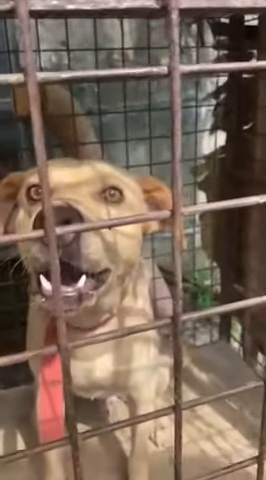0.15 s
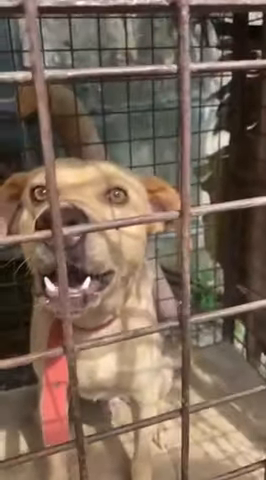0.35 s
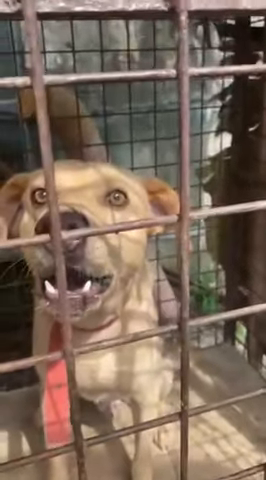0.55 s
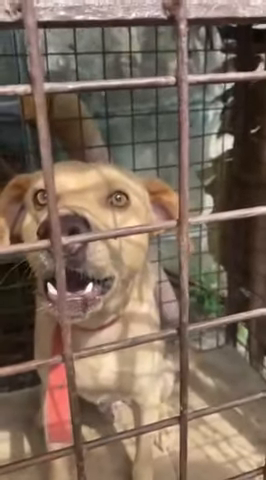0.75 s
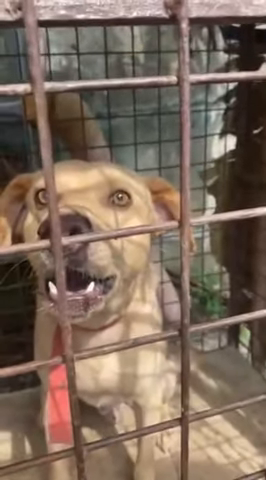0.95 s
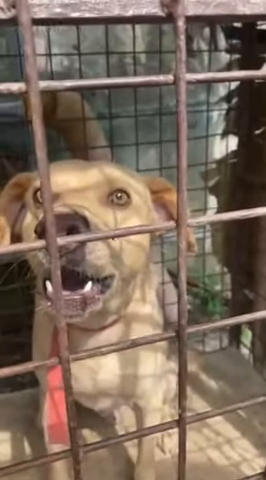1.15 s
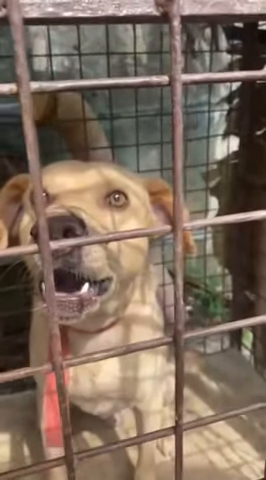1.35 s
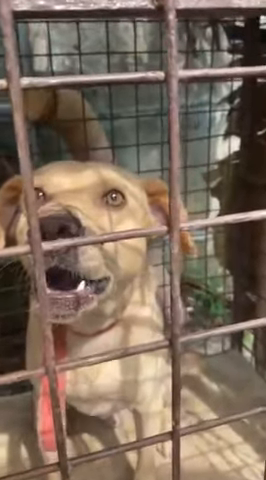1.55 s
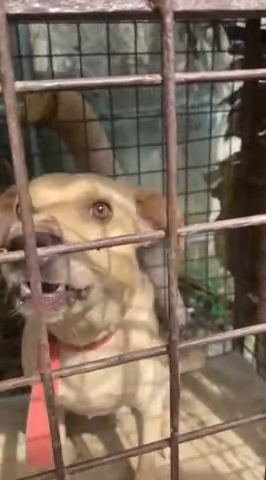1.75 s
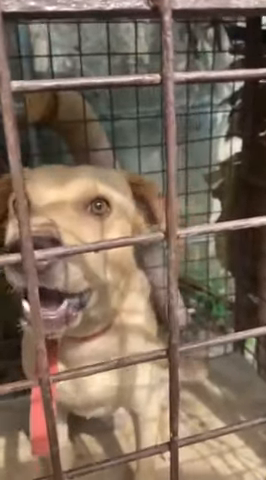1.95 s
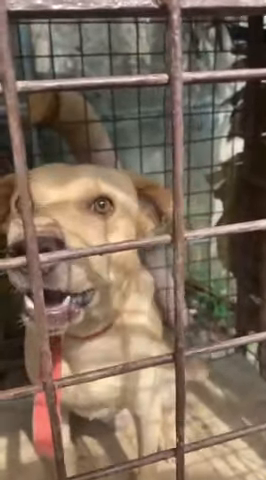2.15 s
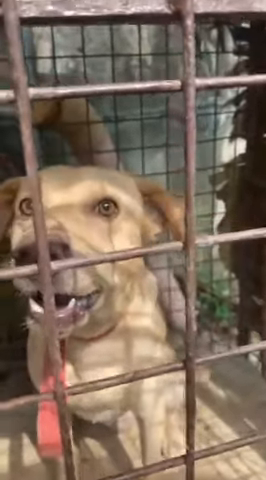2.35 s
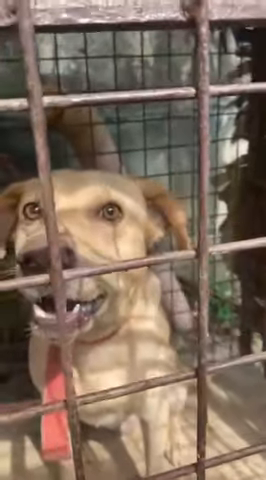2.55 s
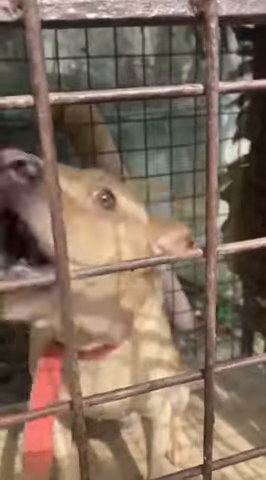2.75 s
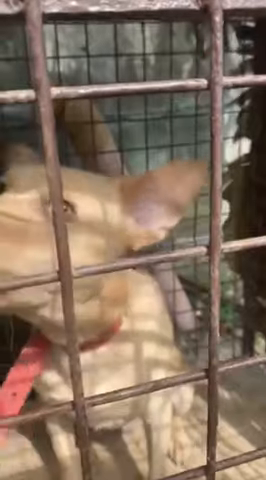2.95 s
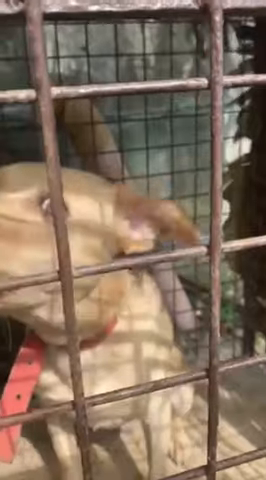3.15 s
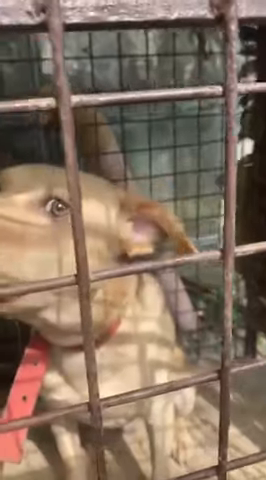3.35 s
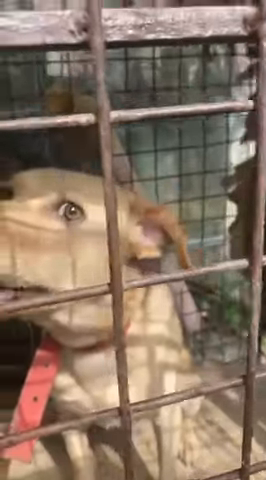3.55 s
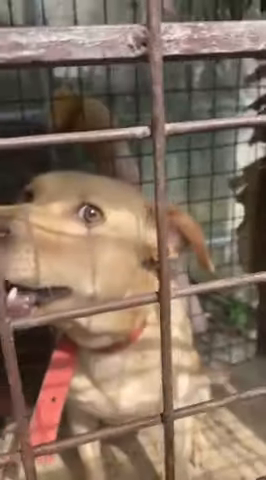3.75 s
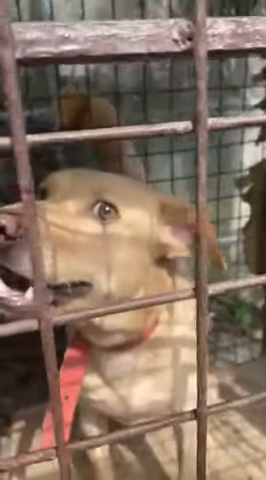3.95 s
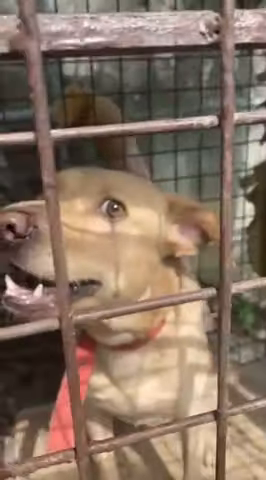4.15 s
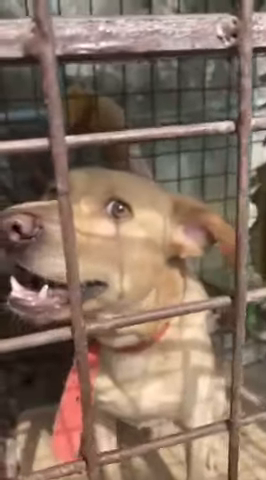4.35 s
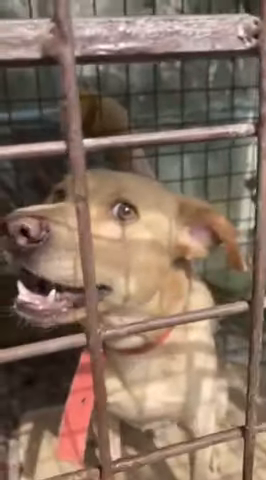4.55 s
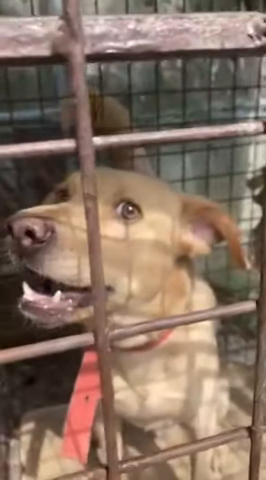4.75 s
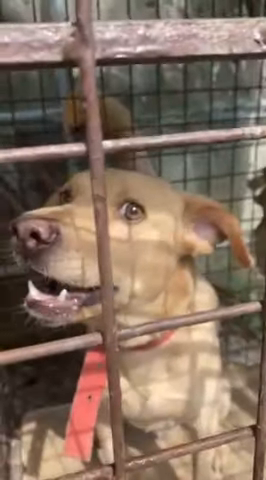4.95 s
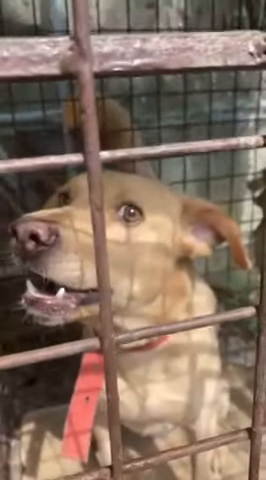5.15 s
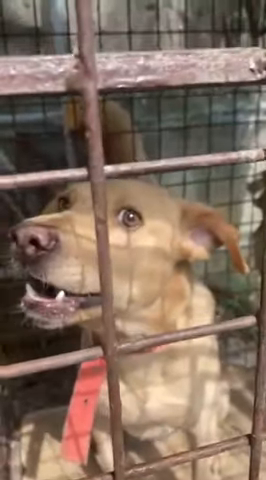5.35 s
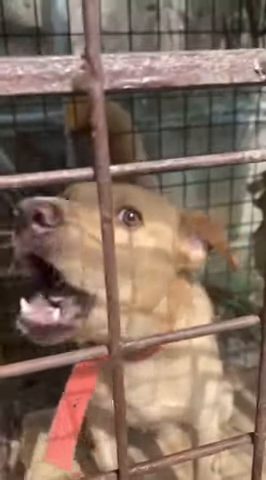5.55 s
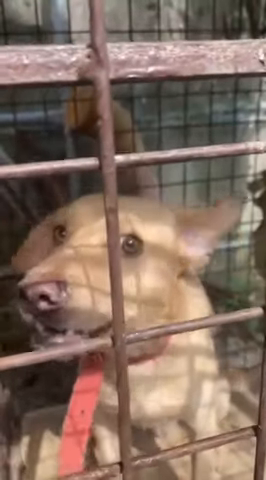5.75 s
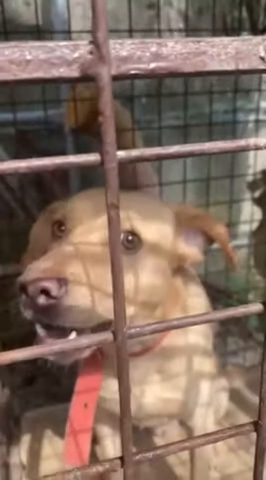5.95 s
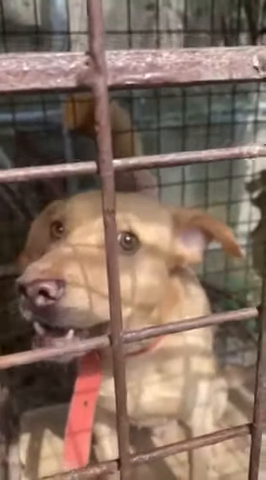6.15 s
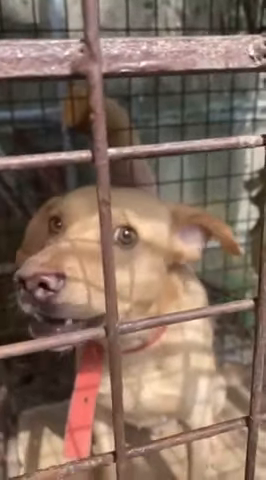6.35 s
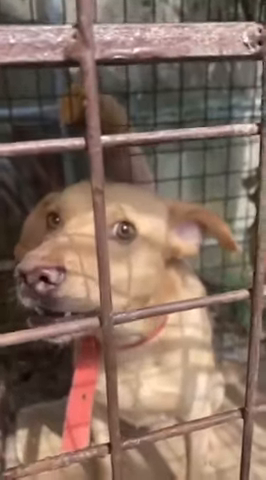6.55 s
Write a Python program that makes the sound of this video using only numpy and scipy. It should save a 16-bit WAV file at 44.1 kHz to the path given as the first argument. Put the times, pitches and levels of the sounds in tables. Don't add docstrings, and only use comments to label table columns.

```python
import sys
import numpy as np
from scipy import signal
from scipy.fft import rfft, irfft, next_fast_len
from scipy.io import wavfile
from scipy.ndimage import uniform_filter1d, minimum_filter1d

SR = 44100
rng = np.random.default_rng(int(sys.argv[2]) if len(sys.argv) > 2 else 0)


def dump(signal):
    limited = np.clip(np.atleast_2d(signal).T, -1, 1)
    pcm = np.round(limited * 32767).astype(np.int16)
    wavfile.write(sys.argv[1], SR, pcm)


def undo_db(level):
    steps = np.asarray(level, float) / 20
    return 10 ** steps


N = 291242

# pitch_hz, level_db (per Hz)
YARD_SPECTRUM = [(15, -30), (25, -0.5), (73, 4), (202, -9), (531, -27.5), (1670, -24.5), (1950, -31.5),
                 (3870, -44), (4180, -49.5), (4630, -49), (5260, -53.5), (8100, -51), (11000, -55),
                 (14300, -72.5), (22000, -120)]
# time_s, effort_db
GROWL_EFFORT = [
    [(0.47, -65), (.49, -50), (.52, -46.5), (0.55, -32.5), (0.684, -32.5), (0.874, -39.5), (0.884, -38),
     (0.938, -39), (1.494, -42), (1.524, -67.5), (1.55, -61)],
    [(1.885, -60), (1.902, -45), (2.002, -34.5), (2.218, -40), (2.234, -41), (2.324, -39), (2.624, -42),
     (2.654, -77), (2.67, -25)],
    [(2.84, -36.5), (2.92, -46.5), (2.98, -41.5), (3.024, -49.5), (3.254, -47.5), (3.314, -50.5),
     (3.642, -59.5), (3.73, -69.5), (3.8, -68.5)],
    [(4.84, -47), (4.854, -50), (4.984, -43), (5.112, -55), (5.342, -48), (5.354, -51.5), (5.452, -42.5),
     (5.48, -61.5), (5.49, -42)],
    [(5.8, -62), (5.846, -53.5), (5.856, -44), (5.934, -44), (6.06, -40.5), (6.206, -57.5), (6.302, -51),
     (6.484, -66.5), (6.544, -55.5), (6.6, -74)],
]
# time_s, effort_db
GRUMBLE_EFFORT = [
    [(0.0, -49), (0.008, -69.5), (0.232, -58), (0.25, -46), (0.29, -73), (0.344, -77), (.353, -61),
     (0.404, -57.5), (0.454, -69), (0.46, -60)],
    [(3.8, -67), (3.836, -60), (3.9, -56), (4.178, -63.5), (4.214, -64.5), (4.3, -70), (4.4, -79),
     (4.46, -92)],
    [(4.47, -97.5), (4.496, -58), (4.562, -51), (4.59, -57.5), (4.646, -33), (4.774, -39), (4.818, -49.5),
     (4.84, -49)],
]
# time_s, effort_db
RATTLE_EFFORT = [
    [(1.72, -36), (1.732, -48.5), (1.786, -40.5), (1.88, -73)],
    [(5.67, -34.5), (5.718, -50), (5.732, -43), (5.8, -71)],
]
# time_s, effort_db
BARK_EFFORT = [
    [(1.54, -48.5), (1.556, -43), (1.58, -23.5), (1.636, -19.5), (1.682, -32), (1.69, -35.5), (1.74, -55.5)],
    [(2.665, -50.5), (2.683, -42), (2.69, -24), (2.712, -21.5), (2.751, -20.5), (2.801, -27),
     (2.839, -59.5), (2.86, -49)],
    [(5.49, -49.5), (5.498, -41), (5.504, -37), (5.518, -28.5), (5.544, -18.5), (5.588, -20),
     (5.654, -44.5), (5.69, -49.5)],
]
# time_s, pitch_hz, second_tone_hz (rises with the jaws), roughness (0-1)
BARK_SWEEP = [
    [(1.54, 455, 463.5, 0), (1.566, 507.6, 522.2, 0.18), (1.582, 580.3, 596.6, 0.34),
     (1.598, 611, 868, 0.6), (1.635, 597.6, 1014, 0.4), (1.665, 539.7, 1013, 0.4), (1.74, 447, 784, 0.77)],
    [(2.665, 420.5, 432, 0.6), (2.688, 506.5, 518, 0.4), (2.706, 592.2, 625, 0.3), (2.72, 587.7, 907, 0.55),
     (2.752, 581.8, 1068, 0.58), (2.8, 540.5, 899, 0.5), (2.86, 415, 730, 0.7)],
    [(5.49, 342.2, 344, 0.4), (5.512, 480.7, 499.4, 0.4), (5.528, 622.7, 745.7, 0.45),
     (5.545, 596.3, 900, 0.7), (5.568, 570, 1098, 0.4), (5.595, 570, 1136, 0.32), (5.62, 498.4, 1055, 0.18),
     (5.69, 454, 774, 0.8)],
]
# tone_start_db, tone_end_db, chest_thump_db
BARK_BALANCE = [
    (-16, -12.5, -41.5),
    (-13, -10.5, -33.5),
    (-10.5, -17.5, -47.5),
]
# time_s, peak_db
HARD_SLAPS = [(0.66, -29), (0.733, -30.5), (0.839, -23.5), (0.884, -25), (1.068, -22.5), (1.17, -32),
              (1.312, -28), (1.444, -25.5), (1.477, -27), (1.744, -33), (1.767, -35), (1.789, -32.5),
              (1.963, -27), (1.998, -29.5), (2.189, -35), (2.327, -27.5), (4.857, -37), (4.882, -35),
              (4.95, -42), (5.732, -34.5), (5.744, -33.5)]
# time_s, peak_db
MORE_HARD_SLAPS = [(0.904, -24), (0.93, -40), (1.126, -32), (1.9, -56), (1.918, -40), (2.132, -31.5),
                   (2.155, -33), (2.203, -21.5), (2.246, -30), (2.371, -30), (2.439, -25.5), (4.606, -42),
                   (5.855, -44), (5.891, -29), (5.938, -33), (5.964, -34), (6.009, -29), (6.034, -31),
                 (6.052, -38), (6.085, -28), (6.247, -42.5), (6.27, -37), (6.327, -40), (6.348, -36),
                 (6.514, -48),
                   (.611, -24), (.644, -42), (.769, -22.5), (1.036, -25), (1.143, -33), (1.237, -23.5),
                (1.403, -30), (1.426, -32), (2.045, -20), (2.109, -29), (2.307, -25.5), (2.401, -23.5),
                (2.537, -21.5), (2.62, -48), (4.553, -38), (4.654, -23), (4.708, -26.5), (4.768, -41),
                (4.914, -35), (4.975, -31), (5.297, -41), (5.332, -43), (5.413, -28), (5.453, -50),
                (5.992, -28), (6.105, -42), (6.127, -36), (6.293, -35.5)]
# start_s, end_s, start_rate_hz, end_rate_hz, roughness (0-1)
SETTLED_FOLDS = [(0, .22, 85, 83, .3), (.53, .64, 165, 150, .3), (.64, .86, 150, 159, .25),
                 (1.4, 1.5, 115, 115, .5), (1.7, 1.82, 45, 45, .35), (2.02, 2.18, 142, 136, .5),
                 (2.5, 2.62, 150, 158, .55), (2.84, 2.94, 325, 198, .3), (2.94, 3.085, 196, 158, .38),
                 (4.62, 4.79, 158, 148, .42), (5.02, 5.08, 150, 150, .55), (5.68, 5.74, 60, 60, .5),
                 (6.39, 6.51, 92, 88, .3)]
# time_s, slap_rate_hz, roughness (0-1)
SHUT_LIP_MOAN = [(3.1, 108, .45), (3.25, 115, .45), (3.38, 113, .3), (3.47, 110, .14), (3.6, 104, .12),
                 (3.65, 100, .12), (3.774, 89.5, .12), (3.842, 105, .14), (3.982, 109, .17),
                 (4.072, 96, .16), (4.15, 98, .16), (4.4, 79, .14)]
# start_s, lip_resonance_hz, lip_db, mouth_db, chest_db
MUZZLE_POSES = [(0, 718, 4, -10.5, -12), (.46, 644, 4.5, -5.5, -8), (.9, 643, 3.5, -3, -8.5),
                (1.7, 682, 4.5, -13, -10.5), (1.88, 649, 5, -13, -2), (1.945, 674, 5.5, -1.5, -4),
                (2.01, 639, 2.5, -5.5, -4.5), (2.84, 711, -15.5, -9, -11.5), (3.099, 649, -6.5, -8, -9),
                (3.44, 654, -3.5, -7, -4), (3.8, 735, 4.5, -5, -4.5), (4.46, 726, 9, -4, -7),
                (4.839, 682, 3, -5, -3), (5.1, 652, 0.5, -4.5, -4), (5.669, 650, -2.5, -10.5, -8),
                (5.798, 658, 2, -2.5, -2.5), (6.18, 673, -11.5, -9, -0.5), (6.37, 677, -7, -4.5, 0.5),
                (6.5, 670, -10, -5, -2.5)]
# start_s, rasp_db, upper_rasp_db, air_db
BREATHINESS = [(0, -5, -5, -6), (.3, -5.5, 0, -1.5), (.46, 1.5, 0, -0.5), (.8, 2, 1.5, 1.5),
               (1.7, -5.5, -1, 1), (1.88, 0.5, -0.5, 3.5), (2.4, 0.5, -2, 1.5), (2.84, -3, -6, -1.5),
               (3.1, 0, -7.5, 0.5), (3.45, 0.5, -7.5, 0.5), (3.8, 0.5, -4, 3), (4.46, -1, 1.5, 6),
               (4.6, 3, 1.5, 2.5), (4.84, 0, 0.5, 2), (5.1, -2, 1.5, -1), (5.669, -10, 2, -1),
               (5.798, 1.5, 0.5, 5.5), (5.96, 1, 1, 2.5), (6.18, -5, 2, 1.5), (6.4, -2, 1.5, 4.5)]
# time_s, shut (0-1)
LIPS_SHUT = [(0, .5), (.45, 0), (2.8, 0), (2.9, 1), (4.4, 1), (4.5, .4), (4.65, 0), (6.1, 0), (6.3, .35)]
# pitch_hz, width_hz, level_db
THROAT_MODES = [(407, 200, -8.5), (528.5, 63, 2)]
# pitch_hz, width_hz, level_db
MOUTH_MODES = [(944, 100, -20.5), (1254, 410, -21), (1513.5, 100, -7), (1850, 380, -31.5)]
# pitch_hz, width_hz, level_db
NOSE_MODES = [(1224, 380, 18.5), (1677, 500, 13.5), (2020, 160, -21)]
# pitch_hz, width_hz, level_db
RASP_MODES = [(2398, 230, 2.5), (3310, 820, -8.5), (3665, 330, -8.5), (3980, 590, -9)]
# pitch_hz, width_hz, level_db
AIR_MODES = [(5130, 1100, 0), (6250, 3000, -10), (8000, 640, -2), (9500, 4400, -11.5), (9600, 170, -10),
             (11000, 610, -23)]
# pitch_hz, width_hz, level_db
OPEN_THROAT_MODES = [(1573, 270, 7.5), (2080, 380, -3), (2617, 370, -0.5), (3342, 300, -16.5),
                     (4260, 440, -17), (5300, 600, -17), (7130, 4300, -16), (8960, 700, -32.5),
                     (10600, 180, -32.5), (10570, 680, -19.5)]
# pitch_hz, width_hz, level_db
PANT_MODES = [(1750, 400, -0.5), (2320, 340, -1), (2900, 500, 1.5), (3600, 280, -9), (4500, 600, -10.5),
              (6200, 2000, -12.5)]
# time_s, level_db, half_length_s
PANT_RUSHES = [
    (1.697, -51.5, 0.083),
    (2.83, -62.5, 0.016),
    (5.673, -46, 0.05),
]
# time_s, level_db, half_length_s
TONE_SURGES = [(1.577, -11, 0.0092), (1.617, -15, 0.0051), (1.644, -15, 0.0079), (1.659, -11.5, 0.0037),
               (1.678, -16, 0.0069), (1.698, -16.5, 0.0031), (2.7, -4, 0.007), (2.732, -22.5, 0.0037),
               (2.752, -19.5, 0.0024), (2.768, -19, 0.0054), (2.782, -17, 0.0051), (2.801, -15.5, 0.0059),
               (2.816, -19, .003), (2.837, -27, 0.0099), (5.523, -16.5, 0.0082), (5.554, -21, 0.0034),
               (5.582, -12, 0.013), (5.614, -12, 0.013), (5.634, -28.5, 0.021)]
# time_s, peak_db, half_length_s
JAW_BURSTS = [(1.6026, -10, 0.0082), (1.6118, -12, 0.0041), (1.6241, -10.5, 0.0017), (1.6377, -9.5, 0.0077),
              (1.6592, -16, 0.0017), (1.6787, -20.0, 0.0045), (1.6963, -29, 0.0035), (1.704, -34.5, 0.0012),
              (2.7119, -10.5, 0.0058), (2.7422, -9.3, 0.0029), (2.7513, -4.5, 0.0066),
              (2.7675, -12.5, 0.0032), (2.7792, -11.5, 0.0013), (2.795, -16.5, 0.0027),
              (2.8168, -18, 0.0017), (2.8235, -32.5, 0.0013), (5.5461, -7, 0.0066), (5.5627, -8.7, 0.0052),
              (5.5716, -11.5, 0.0067), (5.5866, -11, 0.0023), (5.6068, -10, 0.0039),
              (5.6164, -30.5, 0.0035), (5.6392, -25.5, 0.0018)]
# time_s, peak_db, half_length_s
THROAT_BURSTS = [(1.576, -18, 0.004), (1.595, -12, 0.0038), (1.612, -13.5, 0.003), (1.636, -15, 0.008),
                 (1.646, -18.5, 0.0055), (1.679, -21, 0.0046), (1.69, -34.5, 0.0037),
                 (2.6866, -23.5, 0.0017), (2.696, -20.5, 0.0033), (2.7268, -17, 0.0018),
                 (2.735, -14.5, 0.0016), (2.739, -18.5, 0.0065), (2.754, -11.5, 0.0021),
                 (2.7644, -13.5, 0.0061), (2.787, -14.5, 0.0036), (2.803, -18, 0.0037), (5.545, -14, 0.012),
                 (5.562, -19.5, 0.0012), (5.574, -8.5, 0.0056), (5.6095, -18, 0.0024),
                 (5.629, -30.5, 0.0028), (5.642, -32.5, 0.0014)]
# pitch_hz, left_lead_rad
PORT_PHASE = [(0, 0), (300, 0), (700, -.12), (1200, -.15), (2150, 0), (2600, .5), (3600, .3), (4000, 2.5),
              (4800, 3.3), (5400, 6.3), (6900, 6.5), (8500, 8.1), (11700, 8.3)]
# pitch_hz, left_minus_right_db
PORT_BALANCE = [(60, 0), (240, 0), (350, -1.5), (620, -2.2), (1120, -1.5), (2000, -.5), (3600, -1),
                (6450, -.3), (11600, 0)]

USUAL_DB = -45
FULL_DB = -17


def evened(x, seconds=None):
    power = np.mean(x ** 2) if seconds is None else abs(uniform_filter1d(x ** 2, int(seconds * SR)))
    return x / np.sqrt(power + 1e-14)


def read(points, hz):
    f, value = np.transpose(points)
    return np.interp(np.log(hz + 1), np.log(f + 1), value)


def line(t, points):
    return np.interp(t, *np.transpose(points))


def poses(t, table):
    rows = np.array(table)
    current = np.maximum(np.searchsorted(rows[:, 0], t) - 1, 0)
    return uniform_filter1d(rows[current, 1:], int(.03 * SR), axis=0).T


def wander(size, seconds):
    span = int(seconds * SR)
    return evened(uniform_filter1d(uniform_filter1d(rng.standard_normal(size), span), span))


def bursts(t, rows):
    return sum(undo_db(db) * np.exp(-.35 * abs((t - s) / half) ** np.e) for s, db, half in rows)


def highpass(x, hz, order):
    return signal.sosfilt(signal.butter(order, hz, "high", fs=SR, output="sos"), x)


def resonate(x, hz, width, order=1):
    r = np.exp(-np.pi * width / SR)
    gain = [(1 - r) ** order]
    if np.ndim(hz) == 0:
        pole = r * np.exp(2j * np.pi * hz / SR)
        return 2 * signal.lfilter(gain, np.poly([pole] * order), x).real
    turn = np.exp(2j * np.pi * np.cumsum(hz) / SR)
    return 2 * (turn * signal.lfilter(gain, np.poly([r] * order), x * turn.conj())).real


def tract(x, modes, sway=1):
    return sum((-1) ** k * undo_db(db) * resonate(x, hz * sway, width * 1.483, order=2)
               for k, (hz, width, db) in enumerate(modes))


def yard():
    frames, hz = N // 256 + 5, np.fft.rfftfreq(1024, 1 / SR)
    a, b, patches = rng.standard_normal((frames, 513, 3)).T
    patches = evened(uniform_filter1d(uniform_filter1d(patches, 6, 0), 14, 1))
    spectra = (a + 1j * b) * undo_db(read(YARD_SPECTRUM, hz)[:, None] + 2. * patches)
    hum = undo_db(-56.5) * evened(signal.istft(spectra, nperseg=1024, noverlap=768)[1][:N])
    return hum + undo_db(-27.0) * np.array([[1], [-1]]) * hum[::-1]


def kennel(x):
    t = np.arange(SR // 4) / SR
    sparse = rng.random((3, len(t))) < 2000 / SR
    taps = rng.standard_normal((3, len(t))) * sparse * undo_db(-60 * t / 0.14) * (t > .002)
    own_treble, own_body = highpass(taps[1:], 2500, 2), highpass(taps[1:], 280, 3)
    taps = taps[0] + 1.6 * own_treble + .75 * own_body
    return signal.fftconvolve(x[None], taps / np.linalg.norm(taps[0]), axes=1)[:, :N]


def pant():
    t = np.arange(N) / SR
    lumpy = rng.standard_normal(N) * undo_db(3.5 * wander(N, 0.0059))
    air = evened(tract(lumpy, PANT_MODES, 1 + 0.032 * wander(N, .02)))
    return air * sum(undo_db(db) * np.exp(-((t - s) / half) ** 2) for s, db, half in PANT_RUSHES)


def folds(t):
    rate, rough = np.full(N, 116), np.full(N, .8)
    settle_s = .04
    stretches = [[(a, start, r), (b, end, r)] for a, b, start, end, r in SETTLED_FOLDS]
    for rows in [SHUT_LIP_MOAN] + stretches:
        s, goal, goal_rough = np.transpose(rows)
        near = np.interp(t, [s[0] - settle_s, s[0], s[-1], s[-1] + settle_s], [0, 1, 1, 0])
        rate = rate + near * (np.interp(t, s, goal) - rate)
        rough = rough + near * (np.interp(t, s, goal_rough) - rough)
    return rate, rough


def fold_slaps(rate, rough):
    turns = np.cumsum(rate * np.exp(.4 * rough ** 1.5 * wander(N, .005))) / SR
    size_db = rough * (7.5 * np.tanh(.6 * wander(N, .002)) + 3.5 * wander(N, .016))
    slaps = evened(np.diff(np.floor(turns), prepend=0) * undo_db(size_db), 0.21)
    puff_shape = signal.lfilter([1], [1, -np.exp(-1 / (.004 * SR))], slaps ** .75)
    return slaps, evened(puff_shape + 1.4) * rng.standard_normal(N)


def hard_slaps():
    others = MORE_HARD_SLAPS
    slap_s, slap_db = np.transpose(HARD_SLAPS + [(s, db - 2.5) for s, db in others])
    hard = np.zeros(N)
    hard[((slap_s - .002) * SR).astype(int)] = undo_db(slap_db)
    hold = signal.windows.tukey(int(.011 * SR), .5)
    shut_folds = np.roll(signal.oaconvolve(1. * (hard > 0), hold)[:N], -len(hold) + 60)
    return hard, 1 - np.clip(0.15 * shut_folds, 0, .95)


def chest_hum(rate, rough, shut, low):
    steady = np.cumsum(rate * (1 + .08 * rough * wander(N, .012))) / SR
    octave = rate / 350 * (1 - 0.51 * shut) * np.cos(4 * np.pi * steady)
    hum = np.cos(2 * np.pi * steady) + octave
    rumble = evened(tract(low, [(77.6, 66, 1.0), (166.0, 42, 0.048), (272, 146, 0.021)]), 0.21)
    return (1 - rough + 0.51 * shut) * hum + 0.96 * rough * (1 - 0.3 * shut) * rumble


def growl():
    t = np.arange(N) / SR
    efforts = GROWL_EFFORT + GRUMBLE_EFFORT + RATTLE_EFFORT
    extra_db = line(t, sorted(tuple(row) for rows in efforts for row in rows)) - USUAL_DB
    rate, rough = folds(t)
    lip_hz, lip_db, mouth_db, chest_db = poses(t, MUZZLE_POSES)
    rasp_db, upper_db, airy_db = poses(t, BREATHINESS)
    shut = line(t, LIPS_SHUT)

    chest_db = chest_db + 3.5 * (1 - rough) + (0.49 + 0.51 * rough) * extra_db
    mouth_db = -5 + mouth_db + 0.94 * extra_db
    air_db = -7.5 - 7 * shut + airy_db - rasp_db
    rasp_db = -11.5 + rasp_db + 0.73 * extra_db
    level = undo_db(USUAL_DB) * undo_db(np.array([extra_db, chest_db, mouth_db, rasp_db]))

    slaps, puffs = fold_slaps(rate, rough)
    hard, held = hard_slaps()
    sway = 1 + .024 * wander(N, .035)
    low = slaps + .35 * rough * puffs
    throat, knock = (tract(x, THROAT_MODES, sway) + undo_db(lip_db) * tract(x, [(0.98, 90.6, 0.0048)], lip_hz)
                     for x in (low, hard))
    flesh = signal.windows.hann(14) / 6.5
    knock = knock + 0.81 * tract(hard, MOUTH_MODES) + 0.11 * tract(hard, RASP_MODES[:1])
    knock = signal.oaconvolve(knock, flesh)[:N]
    chest = chest_hum(rate, rough, shut, low)

    breathy = .6 * slaps + puffs
    mouth_sway = sway * (lip_hz / 655) ** .8
    mouth = (1 - shut) * tract(breathy, MOUTH_MODES, mouth_sway) + shut * tract(breathy, NOSE_MODES)

    flutter = np.cos(2 * np.pi * np.cumsum(46 * (1 + .25 * wander(N, .02))) / SR)
    hiss = (.45 * slaps + puffs) * undo_db(6.5 * shut * np.minimum(3 * rough, 1) * flutter)
    upper_rasp = (1 - .9 * shut) * tract(hiss, RASP_MODES[2:]) - tract(hiss, RASP_MODES[1:2])
    rasp = tract(hiss, RASP_MODES[:1], sway) + undo_db(upper_db) * upper_rasp
    air = tract(0.091 * slaps + puffs, AIR_MODES) + shut * tract(hiss, [(6110, 330, 0.007)])
    air = level[3] * undo_db(air_db) * evened(air, 0.09)
    parts = (throat, chest, mouth, rasp)
    body = sum(gain * evened(part, 0.07) for gain, part in zip(level, parts))
    return held * (body + air) + 55 * knock


def bark(sweep, effort, early_db, late_db, thump_db):
    t = np.arange(sweep[0][0], sweep[-1][0], 1 / SR)
    hz, jaw_hz, rough = (np.interp(t, np.array(sweep)[:, 0], column) for column in np.transpose(sweep)[1:])
    opened = np.clip(jaw_hz / hz - 1, 0, 1)
    under_db = line(t, effort) - FULL_DB
    tone_db = np.linspace(early_db, late_db, len(t)) - 14.5 * opened + 0.7 * under_db
    middle_db = FULL_DB + 11.5 - 0.5 * opened + 1.1 * under_db
    tone = 0.89 * undo_db(tone_db) + bursts(t, TONE_SURGES)
    middle = .4 * undo_db(middle_db) + undo_db(-10.5) * bursts(t, JAW_BURSTS)
    upper = 0.85 * undo_db(FULL_DB + under_db) + undo_db(-10.5) * bursts(t, THROAT_BURSTS)

    turns = np.cumsum(hz * (1 + .12 * rough * wander(len(t), .0025))) / SR
    throb = undo_db(5. * rough * np.tanh(wander(len(t), .004)))
    second_turns = np.cumsum(jaw_hz * (1 + .05 * wander(len(t), .003))) / SR
    second = sum(np.cos(2 * np.pi * k * second_turns) for k in range(2, 4))
    whole = sum(np.cos(2 * np.pi * k * turns) / np.sqrt(k) for k in range(1, 8))
    halves = sum(np.cos(2 * np.pi * (k + .5) * turns) for k in range(1, 6))
    puff_shape = 0.97 + np.exp(-(turns % 1) / 0.7)
    puffs = evened(resonate(puff_shape * rng.standard_normal(len(t)), 0, 8000))
    voiced = throb * evened(whole + 1.2 * rough * halves + 0.82 * second)
    drive = voiced + (.4 + 1.7 * rough) * (puffs + .35 * rng.standard_normal(len(t)))

    first = np.cos(2 * np.pi * turns) + 0.74 * rough * evened(tract(puffs, [(570, 79, 0)]))
    above = highpass(drive, 620, 4)
    jaws = evened(resonate(above, jaw_hz, 170) - 0.78 * resonate(above, 1250, 170), 0.013)
    jaw_tone = 1.2 * np.cos(2 * np.pi * second_turns) + .6 * np.cos(4 * np.pi * second_turns)
    jaws = jaws + .6 * throb * np.clip(jaw_hz / 200 - 2.8, 0, 1) * jaw_tone
    throat_sway = (jaw_hz / 949) ** 0.3
    throat = tract(drive, OPEN_THROAT_MODES[:2], throat_sway) + tract(drive, OPEN_THROAT_MODES[2:4])
    hiss_db = FULL_DB - 19.5 + 0.83 * under_db
    hiss = undo_db(hiss_db) * evened(tract(drive, OPEN_THROAT_MODES[4:]), 0.014)
    sound = tone * evened(first, 0.025) + middle * evened(jaws, .007) + upper * evened(throat, 0.0093) + hiss
    sound = highpass(sound, 280, 2)

    after = t - t[0] - 0.042
    sound = sound + undo_db(thump_db) * np.exp(-(after / 0.0074) ** 2) * np.sin(2 * np.pi * 177 * after)
    return int(t[0] * SR), sound * signal.windows.tukey(len(t), .08)


def scene():
    dog = growl()
    for sweep, effort, balance in zip(BARK_SWEEP, BARK_EFFORT, BARK_BALANCE):
        at, sound = bark(sweep, effort, *balance)
        size = len(sound) + 300
        dog[at - 300:at + len(sound)] *= 1 - signal.windows.general_cosine(size, [.5, .5]) ** .05
        dog[at - 300:at + len(sound)] *= 1 - signal.windows.tukey(size, .08)
        dog[at:at + len(sound)] += sound
    dog = dog + pant()
    return dog + undo_db(-6.0) * kennel(dog) + yard()


def starved(x, under_db, edge_hz, dip_db):
    hz, t, z = signal.stft(x, SR, nperseg=1024, noverlap=768)
    band = (hz // 345).astype(int)
    band_db = 10 * np.log10([np.mean(abs(z[band == k]) ** 2, 0) + 1e-20 for k in range(band.max() + 1)])
    band_db = uniform_filter1d(band_db, 4, 1)
    top_db = band_db[3:].max(0)
    loud = np.clip((top_db + 50) / 15, 0, 1)
    quiet = np.clip((-62 - top_db) / 10, 0, 1)
    chance = np.repeat(rng.standard_normal((len(t) // 10 + 1, len(band_db))).T, 10, 1)[:, :len(t)]
    bar_db = top_db + under_db + 8 * chance
    bar_db[13] += dip_db * (1 - loud)
    bar_db[28:] -= 13 * loud
    bar_db[11:13] -= 14 * loud
    bar_db += np.clip(2.5 * np.arange(len(bar_db)) - 42, 5, 15)[:, None] * quiet
    bin_db = 10 * np.log10(uniform_filter1d(abs(z) ** 2, 4, 1) + 1e-20)
    keep = (band_db > bar_db)[band] & (bin_db > bar_db[band] - 3 + 5 * quiet)
    jumps = np.repeat(rng.random(len(t) // 5 + 1) ** 2, 5)[:len(t)]
    edge = edge_hz + 2700 * jumps + 1700 * (loud + quiet)
    keep = (keep | (hz[:, None] < 3400)) & (hz[:, None] < np.minimum(edge, edge_hz / 3 + 8650))
    return signal.istft(z * keep, SR, nperseg=1024, noverlap=768)[1][:N]


def band_limit(x):
    return signal.sosfilt(signal.butter(12, 12170, fs=SR, output="sos"), x)


def record(dry):
    size = next_fast_len(N + 4096)
    hz = np.fft.rfftfreq(size, 1 / SR)
    port = undo_db(read(PORT_BALANCE, hz) / 2) * np.exp(.5j * read(PORT_PHASE, hz))
    bass_cut = hz ** 3 / (hz ** 3 + 55 ** 3)
    x = irfft(rfft(dry, size) * bass_cut * np.array([port, 1 / port]), size)[:, :N]
    room_left = np.minimum(.86 / (abs(x).max(0) + 1e-9), 1)
    mix = x * uniform_filter1d(minimum_filter1d(room_left, size=400), size=200)
    return band_limit(mix)


dry = scene()
out = record(dry)
dump(out)
```